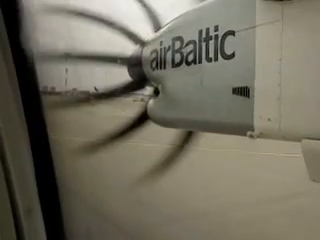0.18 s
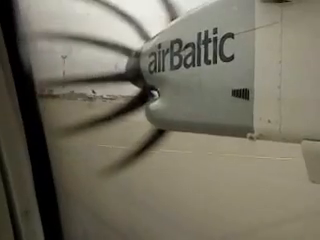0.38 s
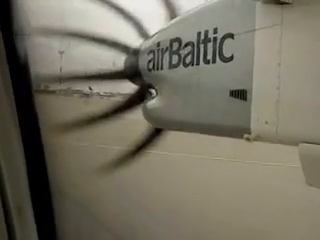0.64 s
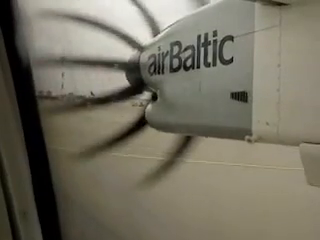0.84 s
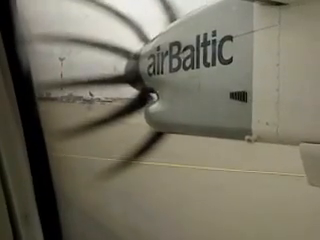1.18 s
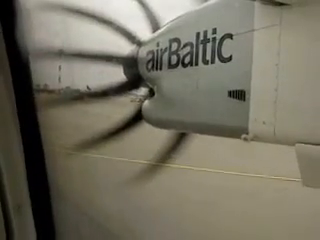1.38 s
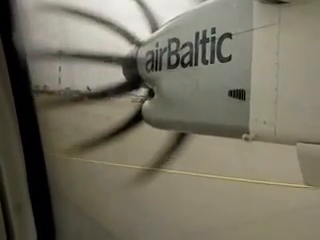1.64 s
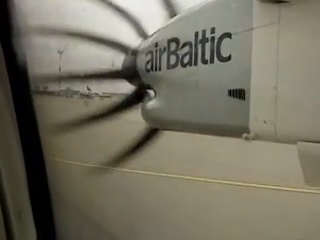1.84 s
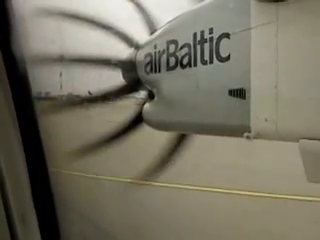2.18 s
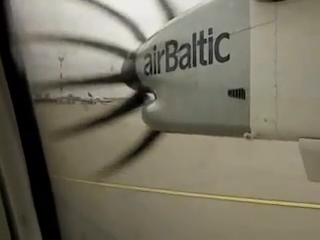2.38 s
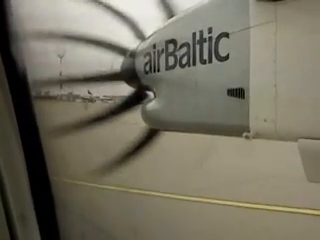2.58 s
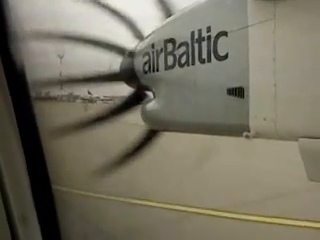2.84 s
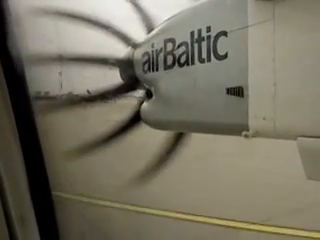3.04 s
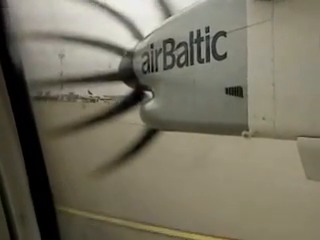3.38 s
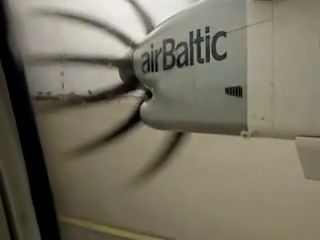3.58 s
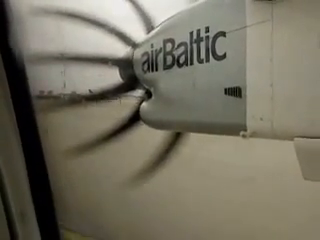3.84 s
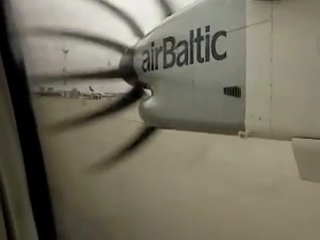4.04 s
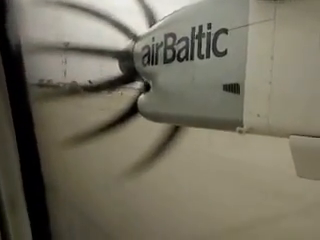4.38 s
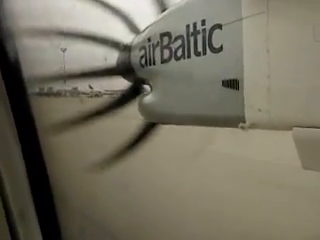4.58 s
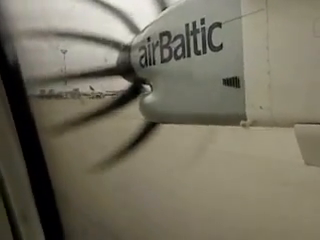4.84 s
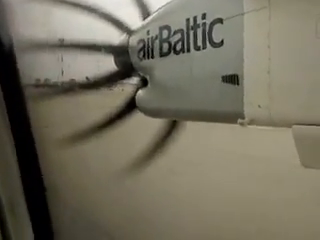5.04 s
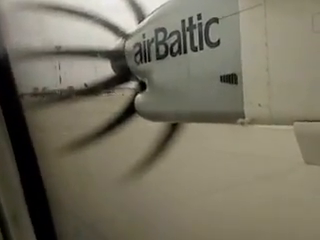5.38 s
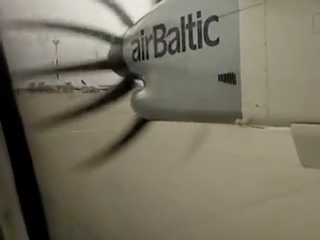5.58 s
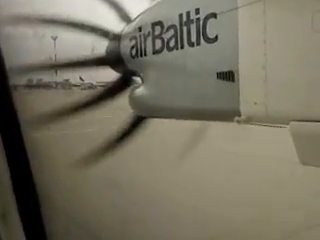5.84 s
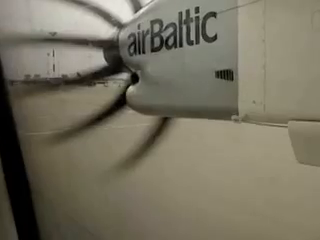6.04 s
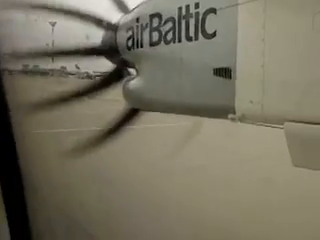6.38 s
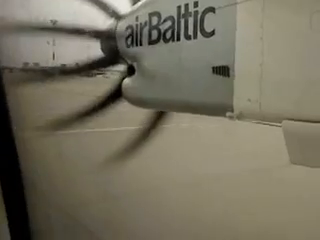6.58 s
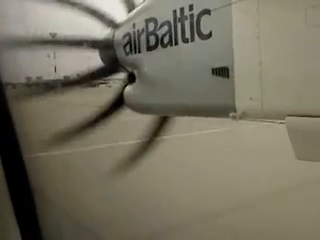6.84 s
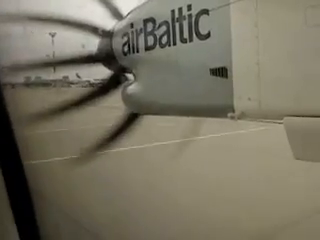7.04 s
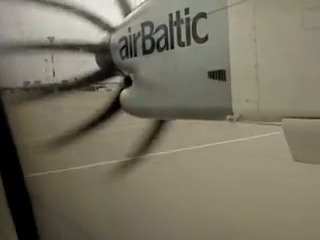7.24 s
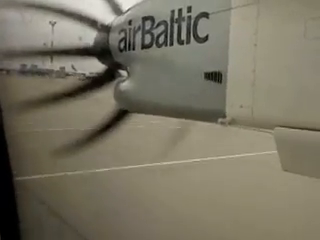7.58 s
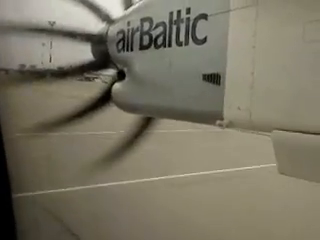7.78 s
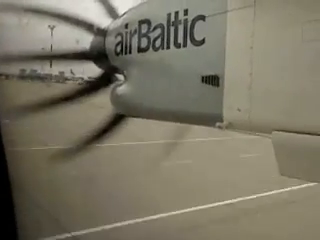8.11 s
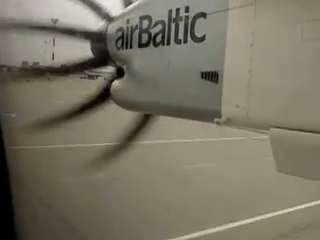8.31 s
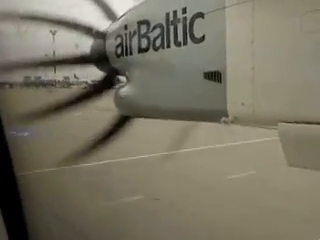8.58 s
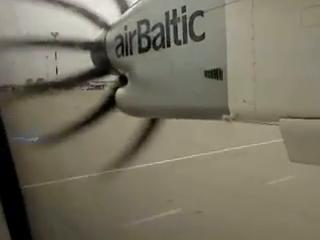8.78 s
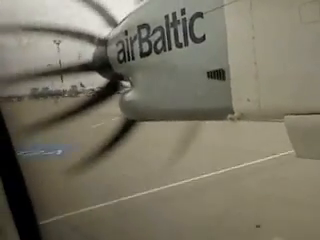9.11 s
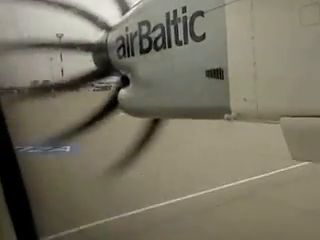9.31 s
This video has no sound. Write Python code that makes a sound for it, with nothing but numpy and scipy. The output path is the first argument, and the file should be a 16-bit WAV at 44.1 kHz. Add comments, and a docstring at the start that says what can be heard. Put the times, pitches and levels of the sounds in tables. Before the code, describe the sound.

Inside a taxiing turboprop cabin, a low propeller drone flutters and booms unevenly over a steady engine hum, muffled buzzing roar and one sharp click.

```python
"""In the cabin of a taxiing turboprop at low power, at a window seat beside the engine.
The blades chop turbulent air into a drone of wavering harmonics that boom now and then.
The engine adds a steady hum and weaker machine tones; the hum makes the noise of the roar buzz.
The cabin wall rings in its panel modes, drawn as noise resonances; a narrow tone throbs in paired pulses.
Now and then something in the cabin clicks: a short burst of coloured noise with a quick decay."""
import sys
import numpy as np
from scipy import signal
from scipy.fft import rfft, irfft, next_fast_len
from scipy.io import wavfile
from scipy.ndimage import uniform_filter1d, minimum_filter1d

SR = 44100
rng = np.random.default_rng(int(sys.argv[2]) if len(sys.argv) > 2 else 0)


def unload_wav(signal):
    """Save mono or channel-first audio to the path in sys.argv[1] as 16-bit WAV at rate SR, clipped to [-1, 1]."""
    wavfile.write(
        sys.argv[1],
        SR,
        np.round(np.clip(np.atleast_2d(signal).T, -1, 1) * 32767).astype(np.int16),
    )


N = 415850

BLADE_HZ = 64.06   # fundamental of the propeller harmonics
HUM_HZ, HUM_DB = 162, -22   # main engine hum, level before its wavering
CUTOFF_HZ = 7980   # upper limit of the clicks and of the final sound


def propeller(wander_hz=1.101, wander_per_order_hz=0.5525, wander_rate_hz=3.56,
              rough=0.59, rough_per_order=0.038, blur_hz=8.5):
    """Blade-passing harmonics: turbulence modulates each at random, the higher orders more widely."""
    # resting level of the harmonics, first to sixth: (level [dB])
    resting_levels = [-33.5, -24, -29.5, -26, -27.5, -37]
    fade_db, fade_hz = 3, 6.9   # largest fade or recovery, and its rate
    phase = turning(BLADE_HZ)
    drone = 0
    for k, resting_db in enumerate(resting_levels):
        number = k + 1
        fade = fade_db * np.tanh(rms_one(flutter(fade_hz).real))
        level_db = resting_db + fade + booming(number)
        pitch_wander_hz = wander_hz + wander_per_order_hz * k
        roughness = rough + rough_per_order * k
        drone = drone + harmonic(number * phase, level_db, pitch_wander_hz, wander_rate_hz, roughness, blur_hz)
    return drone


def harmonic(phase, level_db, wander_hz, wander_rate_hz, rough, blur_hz):
    """Random frequency and amplitude modulation: pitch wanders, strength flutters under a slow swell."""
    drift = turning(wander_hz * rms_one(flutter(wander_rate_hz).real))
    return from_db(level_db) * tone(phase + drift, rms_one(1 + rough * flutter(blur_hz)))


def booming(number):
    """Transient amplification: rise in dB of one harmonic, summed over its booms."""
    # brief swells of the drone: (time [s], harmonic number, length at half height [s], rise [dB])
    booms = [(.5, 2, 0.22, 11), (0.773, 2, 0.11, 6.5), (1.853, 2, 0.18, 5), (1.9, 1, 0.16, 10),
             (3.344, 6, .5, 8), (3.88, 4, 0.11, 12.5), (4.2, 2, 0.38, 8), (4.624, 2, 0.11, 9.5),
             (4.8, 3, .6, 6), (5.42, 2, .24, 9), (6.173, 5, 0.27, 7), (6.9, 2, 0.11, 10),
             (7.27, 5, 0.15, 9.5), (7.526, 2, 0.17, 7.5), (7.93, 2, 0.22, 7.5), (8.306, 4, 0.24, 2.5),
             (8.38, 2, 0.17, 8), (9.2, 2, 0.21, 5)]
    return sum(rise_db * bell(s, length_s) for s, which, length_s, rise_db in booms if round(which) == number)


def engine(phase, unsteady=.45, unsteady_hz=1.0, hum_waver=0.26):
    """Rotating machinery radiates line spectra: one main hum among weaker, slightly unsteady tones."""
    # tones of shafts, gears and pumps: (frequency [Hz], level [dB])
    machine_tones = [(72.0, -46), (81.0, -45.5), (89.9, -44.5), (99.0, -45.5), (152.9, -34.5),
                     (173.6, -33.5), (243.2, -31), (271.2, -36.5), (342.2, -40), (486.2, -41),
                     (624.1, -42.5), (1248.6, -51)]
    out = from_db(HUM_DB) * tone(phase, 1 + hum_waver * flutter(5.6))
    for hz, level_db in machine_tones:
        wavering = rms_one(1 + unsteady * flutter(unsteady_hz))
        out = out + from_db(level_db) * tone(turning(hz), wavering)
    return out


def roar(phase, exhaust_db, air_db, buzz=0.14, side_buzz=0.12, side_hz=152.3,
         buzz_low_hz=450, buzz_high_hz=1500, surge=.6, gust=0.6, flicker_db=0.67):
    """Modulated broadband noise: panels resonate, the middle pulses with the engine, the top with airflow."""
    # exhaust and airflow through the cabin wall: (frequency [Hz], density before the low cut [dB per Hz])
    wall_noise = [(22, -62), (45, -56), (100, -49), (215, -47.5), (285, -50.5), (420, -46), (520, -55),
                  (1090, -58), (1190, -64.5), (2550, -70), (3100, -76.5), (4700, -79.5), (6300, -89.5),
                  (7850, -91)]
    # wall panels, cabin air and vents: (frequency [Hz], width before squaring the curve [Hz], level [dB])
    panels = [(375.5, 13, -32.5), (484, 18, -35), (563, 18, -44.5), (591.6, 13, -37), (654.7, 22, -36),
              (795, 59, -34.5), (886, 13, -44), (966, 65, -38.5), (1050, 65, -40), (1334, 94, -45.5),
              (1524, 120, -44.5), (2500, 140, -53.5), (5730, 108, -60.5), (7010, 143, -63.5)]
    low_cut = 1 / (1 + (18 / bins()) ** 4)
    power = gains(wall_noise) ** 2 * low_cut + sum(resonance(*mode) for mode in panels)

    low = 1 / (1 + (bins() / buzz_low_hz) ** 8)
    not_high = 1 / (1 + (bins() / buzz_high_hz) ** 8)
    rumble = coloured(np.sqrt(power * low))
    middle = coloured(np.sqrt(power * (1 - low) * not_high))
    hiss = coloured(np.sqrt(power * (1 - low) * (1 - not_high)))

    side = turning(side_hz)   # a second shaft tone, and its sum with the main hum
    side_pulses = np.cos(side) + np.cos(side + phase)
    pulsing = rms_one(1 + buzz * np.cos(phase) + side_buzz * side_pulses)
    # only a share of each level's departure from its mean is heard
    exhaust = from_db(surge * (exhaust_db - exhaust_db.mean()))
    rush = from_db(gust * (air_db - air_db.mean()) + flicker_db * flutter(12).real)
    return rumble + exhaust * pulsing * middle + rush * hiss


def throb(strong=1.5, weak=1.0, murmur=0.52, pulse_s=0.033, uneven=0.15, sag_hz=7):
    """Periodic excitation of one narrow mode: a random murmur plus pulses, strong and weak in turn."""
    # the throbbing resonance: (frequency [Hz], width [Hz])
    hz, width_hz = (952, 28)
    # bouts of stronger pulses: (time [s], length at half height [s], rise [dB])
    bout_list = [(.33, .4, 5), (2.453, .9, 5), (4.6, .6, 3), (8.451, 1, 3)]
    pairs_per_s, first_strong_s = 4.4986, .101
    level_db = -35   # of murmur and pulses together
    turn = np.pi * pairs_per_s * (seconds() - first_strong_s)
    half_width = np.pi * pairs_per_s * pulse_s   # a pulse falls to 1/e about pulse_s from its peak
    strong_pulses = strong * np.exp(-(np.sin(turn) / half_width) ** 2)
    weak_pulses = weak * np.exp(-(np.cos(turn) / half_width) ** 2)
    pulses = strong_pulses + weak_pulses
    bouts = from_db(sum(rise_db * bell(s, length_s) for s, length_s, rise_db in bout_list))
    ring = murmur * flutter(width_hz / 2) + bouts * pulses * (1 + uneven * flutter(2.7))
    # each pulse sags in pitch, no two quite alike
    pitch = hz - sag_hz * np.sin(2 * 2 * turn) + 6 * flutter(3).real
    return from_db(level_db) * tone(turning(pitch), rms_one(ring))


def clicks(level_db=-6, tail_db=-7, tail_t60=0.2):
    """Impulsive sound in a padded cabin: a gritty crack, then an exponential decay (60 dB in tail_t60 s)."""
    # clicks and rattles: (time [s], peak level before level_db is added [dB], crack's fall to 1/e [s])
    click_list = [(.998, -35, 0.025), (2.464, -36, 0.036), (2.66, -37, 0.028), (5.0517, -15.5, 0.0054),
                  (8.57, -42, 0.048), (8.897, -42, 0.01)]
    # relative spectrum of the clicks: (frequency [Hz], level [dB])
    click_colour = [(500, -2.5), (1300, 1.5), (2400, 3), (4500, -2), (7000, -1), (8000, -8.5)]
    envelope = np.zeros(N)
    for s, peak_db, crack_s in click_list:
        age = np.maximum(seconds() - s, 0)
        attack = np.minimum(age * 1000, 1)   # rises within 1 ms
        crack = np.exp(-(age / crack_s) ** 2)
        tail = from_db(tail_db) * np.exp(-np.log(1000) * age / tail_t60)
        envelope += from_db(peak_db + level_db) * attack * (crack + tail)
    grit = rms_one(coloured(gains(click_colour) * (bins() < CUTOFF_HZ)))
    return envelope * grit


def resonance(hz, width_hz, level_db):
    """Noise-driven resonance: power per Hz of a squared resonance curve whose total is level_db."""
    detuning = (bins() ** 2 - hz ** 2) / (bins() * width_hz)
    shape = 1 / (1 + detuning ** 2) ** 2
    return from_db(level_db) ** 2 * shape / (width_hz * np.pi / 4)


def coloured(gain):
    """Spectral shaping: white noise filtered to an amplitude density per root Hz of the given gain."""
    size = next_fast_len(N)
    white = rng.standard_normal(size)
    return irfft(rfft(white) * gain, size)[:N] * np.sqrt(SR / 2)


def flutter(width_hz, size=2048):
    """Narrow-band random modulation: complex, rms 1, its amplitude spectrum halved at width_hz either side."""
    hz = np.fft.fftfreq(size, N / SR / size)
    white = rng.standard_normal(size) + 1j * rng.standard_normal(size)
    slow = np.fft.ifft(np.fft.fft(white) / (1 + (hz / width_hz) ** 2))
    return np.interp(np.arange(N) * size / N, np.arange(size), rms_one(slow))


def turning(hz):
    """Phase is the integral of frequency: radians turned at hz, from a random start."""
    return 2 * np.pi * (np.cumsum(hz * np.ones(N)) / SR + rng.random())


def tone(phase, wavering):
    """Quadrature modulation: a sine carried by a complex wavering; rms 1 if the wavering has rms 1."""
    return np.sqrt(2) * (wavering.real * np.cos(phase) - wavering.imag * np.sin(phase))


def bell(s, length_s):
    """Gaussian envelope: a swell from 0 to 1 and back, centred on s, with length_s at half height."""
    return .5 ** ((2 * (seconds() - s) / length_s) ** 2)


def from_db(db):
    """Logarithmic level: decibels to amplitude gain."""
    return 10 ** (np.asarray(db) / 20)


def rms_one(x):
    """Effective value: scale to an rms of 1."""
    return x / np.sqrt(np.mean(np.abs(x) ** 2) + 1e-20)


def seconds():
    """Sampling: time of every sample."""
    return np.arange(N) / SR


def in_time(rows):
    """Linear interpolation: each column of a curve, at every sample."""
    s, *columns = np.transpose(rows)
    return [np.interp(seconds(), s, c) for c in columns]


def bins():
    """Discrete spectrum: its frequencies in Hz, kept at 1 or above."""
    return np.maximum(np.fft.rfftfreq(next_fast_len(N), 1 / SR), 1)


def gains(points):
    """Spectral envelope: (Hz, dB) points as gains, interpolated over log frequency."""
    hz, db = np.transpose(points)
    return from_db(np.interp(np.log(bins()), np.log(hz), db))


def scene():
    """Superposition: all sources add at the window seat; hum and buzz share one phase."""
    # slow change of the roar, before centring and scaling: (time [s], exhaust [dB], rush of air [dB])
    airflow = [(0.0, -24.5, -33.5), (0.84, -27.5, -36), (1.05, -22, -32.5), (1.65, -25, -34.5),
               (4.54, -25.5, -34.5), (5.3, -23.5, -35), (5.59, -27, -35), (5.85, -20.5, -32),
               (6.17, -25, -34), (8.3, -25, -35.5), (8.32, -29, -36.5), (8.8, -23, -32.5),
               (9.38, -23, -34.5), (9.43, -22.5, -33.5)]
    exhaust_db, air_db = in_time(airflow)
    phase = turning(HUM_HZ + 0.2 * flutter(0.24).real)   # the governor lets the speed wander slightly
    return (propeller() + engine(phase) + roar(phase, exhaust_db, air_db) + throb() + clicks())[None]


def record(dry, ceiling=0.49, hold_s=0.01):
    """Peak limiting and band limiting: a quick gain dip tames high peaks, a steep low-pass cuts the top."""
    size = int(hold_s * SR)
    needed_gain = ceiling / np.maximum(np.abs(dry), ceiling)
    gain = uniform_filter1d(minimum_filter1d(needed_gain, size), size)
    low_pass = signal.ellip(14, .1, 90, CUTOFF_HZ, fs=SR, output="sos")   # ripple and stopband in dB
    return signal.sosfilt(low_pass, gain * dry)


dry = scene()
out = record(dry)
unload_wav(out)
```